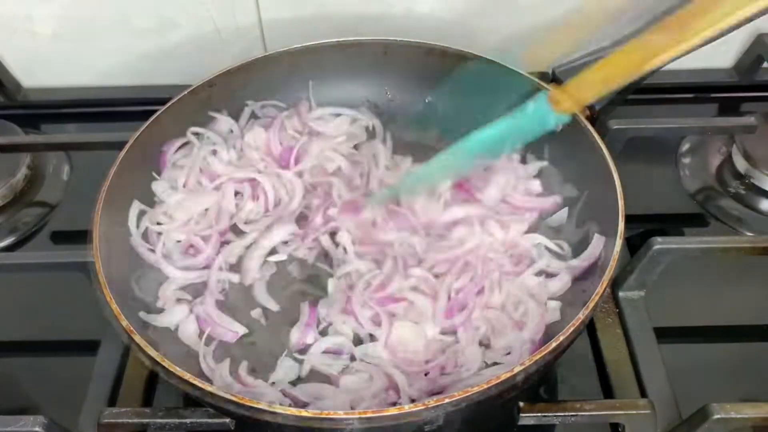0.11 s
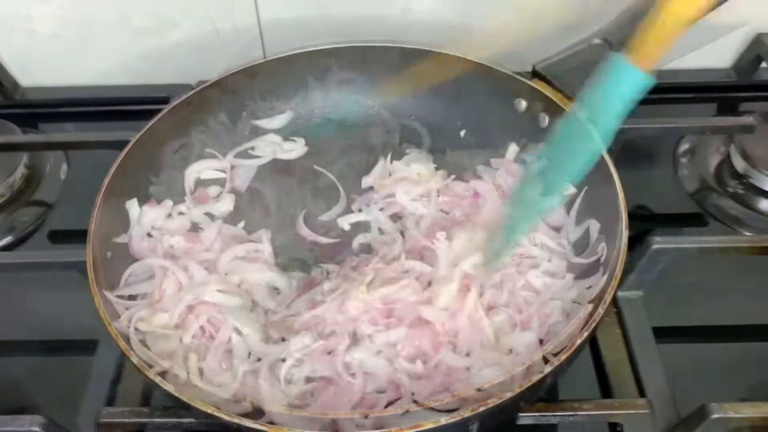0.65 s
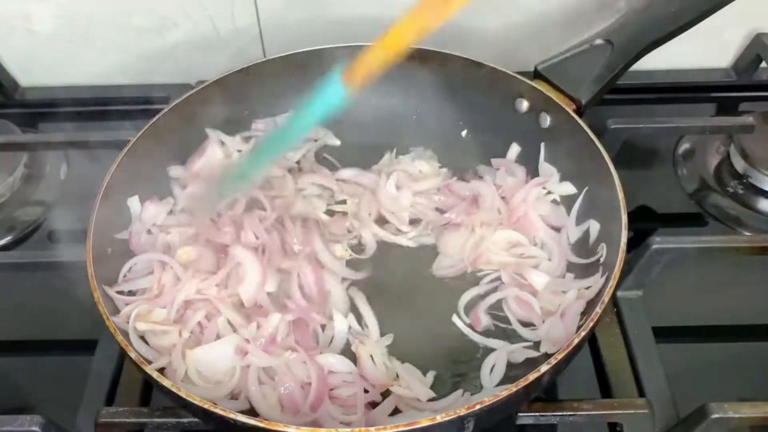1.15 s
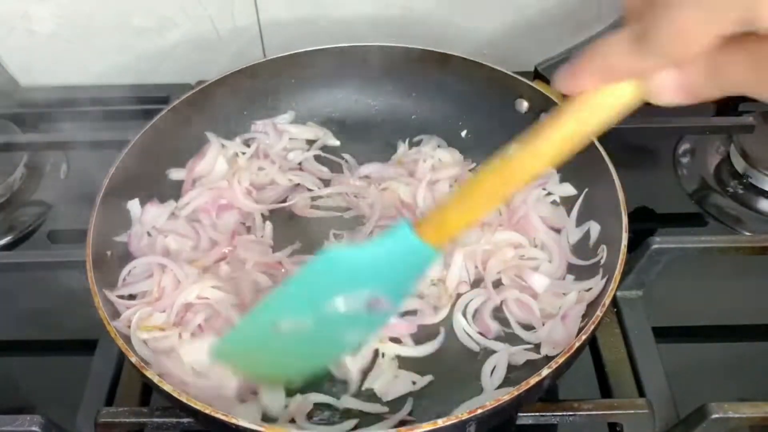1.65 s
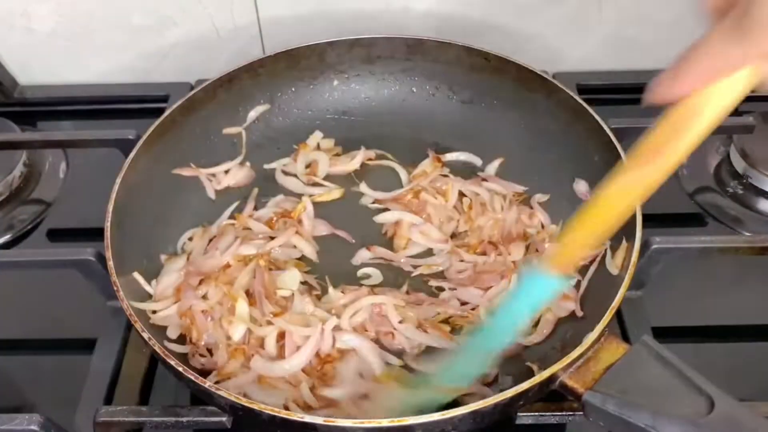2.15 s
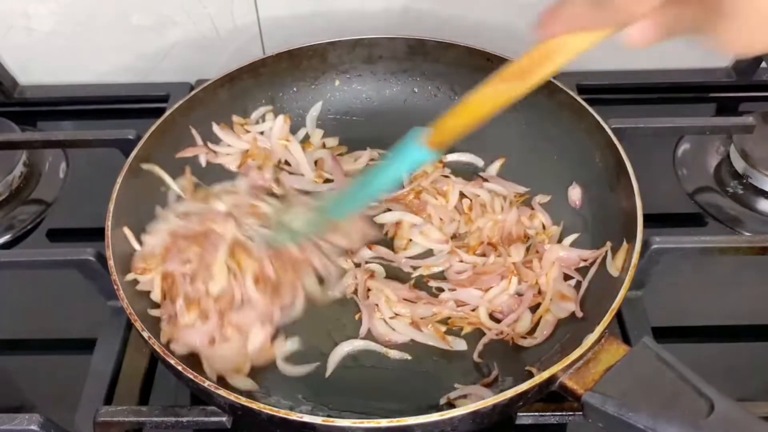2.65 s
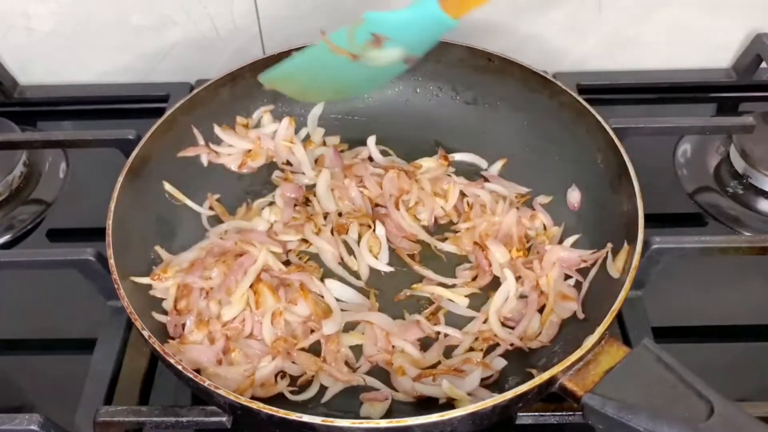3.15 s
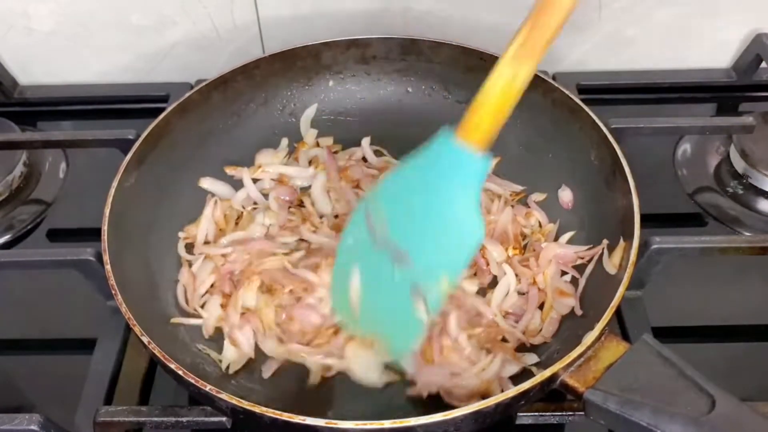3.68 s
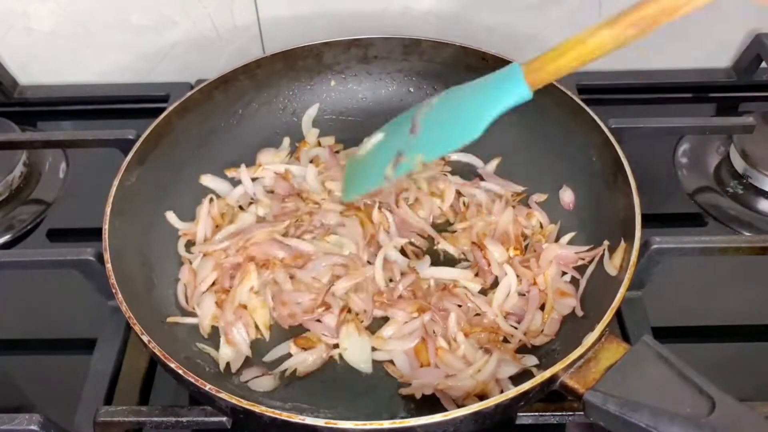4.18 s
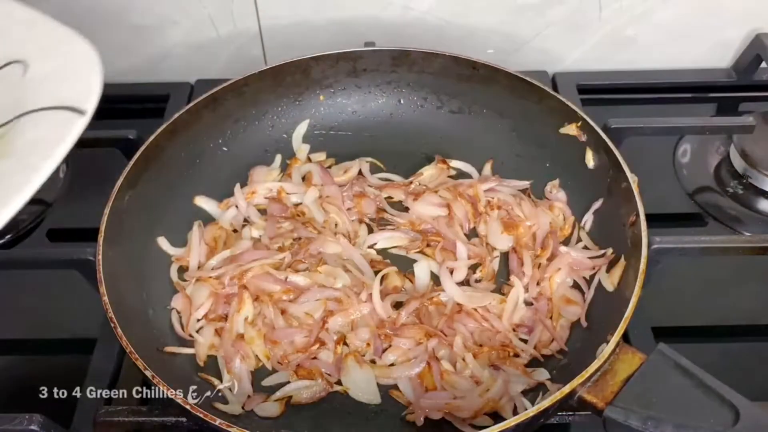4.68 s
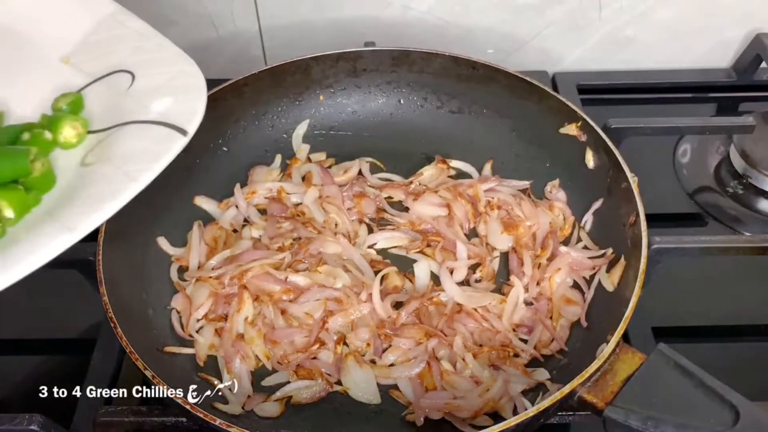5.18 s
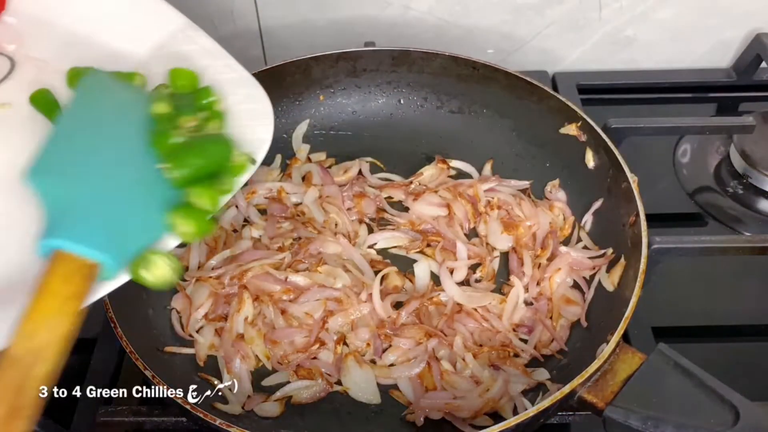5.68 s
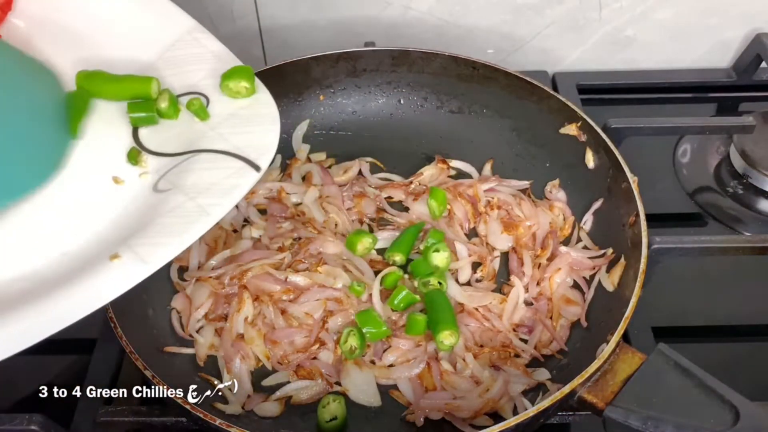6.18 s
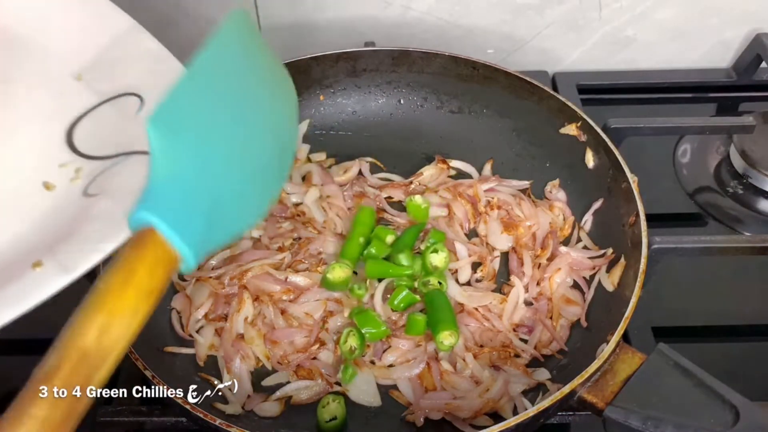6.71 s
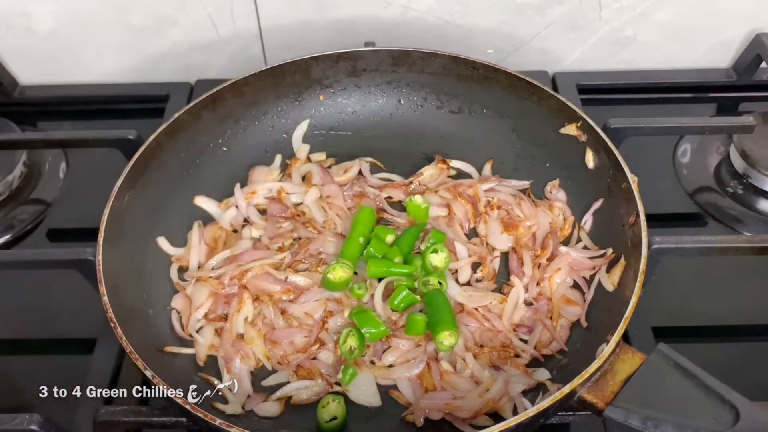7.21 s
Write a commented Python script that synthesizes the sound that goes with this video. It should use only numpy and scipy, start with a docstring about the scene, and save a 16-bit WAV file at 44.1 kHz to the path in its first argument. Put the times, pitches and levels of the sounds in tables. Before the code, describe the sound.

A strong low fan hum near 100 hertz swells over softly sizzling onions in a pan, with sharp fat spits and occasional dull spatula knocks.

```python
"""Sliced onions fry softly in a pan: dense tiny steam bursts hiss, fat spits, a few steam squeaks.
A soft spatula knocks the pan, ringing its modes. Above it an extractor fan: the motor hums near
100 Hz as a wandering sine, its air flow rumbles in the hood as noise with resonances.
Four passages are joined by short fades; from the third on the hum is strong and clean."""
import sys
import numpy as np
from scipy import signal
from scipy.fft import rfft, irfft, next_fast_len
from scipy.io import wavfile

SR = 44100
rng = np.random.default_rng(int(sys.argv[2]) if len(sys.argv) > 2 else 0)


def materialize(psi):
    """Save the field psi as 16-bit PCM at rate SR to the path in sys.argv[1].

    A 1-D psi becomes a single channel; in a 2-D psi each row is a channel.
    """
    bounded = np.clip(np.atleast_2d(psi).T, -1, 1)
    quanta = np.round(bounded * 32767).astype(np.int16)
    wavfile.write(sys.argv[1], SR, quanta)


def boost_factor(decibels):
    """Convert a level in decibels to a linear amplitude factor."""
    exponent = np.asarray(decibels, float) / 20
    return 10 ** exponent


N = 323253

# passage joins: fade-out start t/s, silent from t/s, fade-in start t/s, full again t/s
JOINS = [(.0877, .0881, .0915, .114), (2.0815, 2.0822, 2.1005, 2.124), (4.317, 4.3415, 4.342, 4.375)]
# per passage: hum f/Hz, level/dB rms, left-right level/dB, left phase lead/rad
HUM_BY_PASSAGE = [(95, -26, -1.5, -.3), (101, -32, -2.5, -0.3), (98.5, -15.5, -3, -0.11),
                  (99.1, -16, -1.53, -0.16)]
# per passage: air flow base level/dB rms in 250-1000 Hz, frying treble offset/dB
MIX_BY_PASSAGE = [(-37.5, -2), (-41, 0.46), (-38.5, 0), (-39.5, -2)]
# unsteady hood drones: f/Hz, level/dB rms before DRONE_SWELL, wander corner f/Hz
DRONES = [(198, -50.5, 0.3), (208.8, -38.5, 3.38), (217.1, -41, 4.6)]
# slow gain of all drones: t/s, level/dB
DRONE_SWELL = [(0, -3), (.2, 4), (.6, -6), (1.25, 6), (1.65, 6), (1.85, -10), (2.2, 4.5), (2.65, -9),
               (3.0, 2.5), (3.3, -1.5), (3.9, 4), (4.3, 2), (4.9, -1.5), (5.45, 5), (5.9, -7.5), (6.3, 2),
               (6.65, 0.5), (7.33, 0)]
# broad air noise density: f/Hz, level/dB per Hz (relative to HOOD)
RUSH = [(20, -82), (40, -72.5), (55, -51.5), (110, -64.5), (160, -61.5), (230, -76), (260, -65),
        (330, -63.5), (420, -71.5), (550, -73), (850, -74.5), (1050, -80.5), (1600, -85), (3000, -99)]
# hood resonances stirred by the air: f/Hz, -6 dB width/Hz, level/dB (relative to RUSH)
HOOD = [(76, 14, -42), (107.5, 8, -33), (121.2, 25, -43.5), (175.8, 8.8, -44), (200.4, 37, -42.5),
        (299.5, 27, -45.5), (314.5, 9.1, -45.5), (332.2, 14, -47.5), (357.7, 7.4, -45), (384, 11, -47.5),
        (405.3, 11, -57), (463, 53, -50.5), (595.6, 34, -52.5), (632, 47, -49.5)]
# spatula knocks: t/s, peak level/dB before a 1 dB tilt per side, softness cut-off f/Hz
KNOCKS = [(.959, -25.5, 900), (1.596, -17.5, 2200), (4.263, -22, 642)]
# pan modes: f/Hz, relative level/dB, t60/s
PAN_MODES = [(126, -3, 0.045), (374, -1, 0.039), (467, 6, 0.028), (636, 10, 0.031), (860, 1.5, 0.089),
             (945, -23, 0.026), (1226, 0.5, 0.035), (1460, -25, .02)]
# steam squeaking out from under a slice: t/s, length/s, f/Hz, level/dB rms before swell and stereo
SQUEAKS = [(1.194, 0.12, 6300, -41.5), (6.475, .02, 6500, -46), (6.773, 0.035, 6500, -36.5),
           (6.958, .06, 7000, -40.5)]
# loud fat spits: t/s, peak level/dB before stereo, ring f/Hz, crack-to-ring level/dB
SPITS = [(0.7079, -22.5, 12500, 4), (0.7781, -21, 2500, 17), (1.1003, -7, 1750, 6),
         (1.1764, -20, 7450, -12), (1.4476, -21, 7500, -17), (1.7427, -16.5, 8350, 0),
         (1.9924, -22, 12500, -6), (2.2643, -25, 11500, -8), (2.7683, -9, 1410, 14), (2.9826, -22, 3250, 2),
         (3.1118, -21.5, 13000, -6.5), (3.253, -16, 3370, 11), (4.2258, -29, 5500, -6),
         (6.09, -23.5, 3200, 7), (6.2399, -23.5, 11000, -8), (6.339, -24.5, 6950, 8),
         (6.3672, -21, 3320, 14), (6.4706, -17.5, 6200, 2), (6.6334, -20, 9350, -1), (6.758, -19, 3340, 17),
         (6.9729, -17.5, 3200, 8), (7.1369, -13.5, 7400, -10), (7.1902, -7.5, 4800, 0.5)]
# frying vigour: t/s, level/dB rms in 2-7 kHz before flicker
VIGOUR = [(0.0, -55), (.455, -55), (.76, -47.5), (.97, -44), (1.19, -44), (1.78, -43.5), (1.91, -45),
          (2.03, -47.5), (2.08, -41.5), (2.13, -51), (2.7, -49), (3.37, -51), (4.31, -51), (4.38, -51.5),
          (5.85, -51.5), (6.9, -49.5), (7.2, -48), (7.33, -46)]
# hiss spectrum: f/Hz, relative level/dB per Hz
HISS = [(600, -0.5), (1200, -7.5), (2000, 0.5), (2700, -0.5), (3400, 2.5), (5000, 1), (7500, 0.5),
        (8300, 3.5), (9500, 1), (13000, 1.5), (14500, -3.5), (15600, -7), (15800, -40)]
# power share arriving straight, alike in both channels: f/Hz, share/0-1
DIRECT = [(60, 0.68), (130, 1), (220, 0.7), (380, 0.79), (550, 0.26), (800, 0.2), (1500, 0.24), (3500, 0),
          (5500, 0.43), (8500, 0.13), (10000, 0.42), (11000, 1), (16000, .99)]
# channel balance: f/Hz, left-right level/dB
SIDES = [(60, 2.5), (180, -6), (550, -1), (1650, 0.5), (4970, -1.0), (15000, -0.5)]
# phase lead of the straight sound at right: f/Hz, lead/rad
RIGHT_LEADS = [(0, 0), (430, .45), (750, 1.3), (1000, -1.5), (1600, .7), (2300, -.5), (2700, -2.5),
               (4000, -2), (4700, -3.2), (7000, -7.5), (7500, -4.8), (8500, -3.2), (10200, 0),
               (13570, 6.28), (16960, 12.57)]

HUM_WAVER_DB, HUM_WAVER_HZ, HUM_WANDER_HZ = -39.5, 4.4, 0.18
AIR_FOLLOWS = 0.26  # dB of air per dB of vigour
SMALL_SPITS, SMALL_OVER_HISS_DB = 30, 17
RING_OCTAVES, CRACK_LOW_HZ, CRACK_HIGH_HZ = 0.85, 1250, 14200
SPRAY_S, SIZZLE_S = 0.005, 0.025  # 1/e decays


def rms_one(x):
    """Scale to rms 1."""
    return x / np.sqrt(np.mean(x ** 2) + 1e-20)


def in_time(rows):
    """Columns of a curve, interpolated at every sample."""
    s, *columns = np.transpose(rows)
    return [np.interp(np.arange(N) / SR, s, c) for c in columns]


def by_passage(rows):
    """Columns of a per-passage table, held at every sample."""
    silent_from = np.array(JOINS)[:, 1] * SR
    return np.array(rows)[np.searchsorted(silent_from, np.arange(N))].T


def at_hz(points, hz):
    """Table interpolated over log frequency."""
    table_hz, value = np.array(points).T
    return np.interp(np.log(hz), np.log(table_hz), value)


def drift(corner_hz):
    """Random wander of rms 1: noise through a double pole, run at SR/40."""
    r = np.exp(-80 * np.pi * corner_hz / SR)
    noise = rng.standard_normal(N // 40 + 2002)
    slow = signal.lfilter([1], [1, -2 * r, r * r], noise)[2000:]
    return np.interp(np.arange(N) / 40, np.arange(len(slow)), rms_one(slow))


def unsteady(db, corner_hz):
    """Complex amplitude whose strength and phase wander randomly."""
    return boost_factor(db) * (drift(corner_hz) + 1j * drift(corner_hz)) / np.sqrt(2)


def butter(x, order, hz, kind="low"):
    """Causal Butterworth filter."""
    return signal.sosfilt(signal.butter(order, hz, kind, fs=SR, output="sos"), x)


def level_in(x, low_hz, high_hz):
    """Rms of the channels' mean between two frequencies."""
    mid = butter(x.mean(axis=0), 4, [low_hz, high_hz], "band")
    return np.sqrt(np.mean(mid ** 2))


def split(x, cuts_hz):
    """Bands peeled off from below, up to the last cut, without phase shift."""
    for hz in cuts_hz:
        low = signal.sosfiltfilt(signal.butter(2, hz, fs=SR, output="sos"), x)
        x = x - low
        yield low


def stereo(three, power):
    """Shape by power(hz); row 0 arrives straight in both channels, rows 1-2 are each one's diffuse share."""
    size = next_fast_len(N)
    hz = np.maximum(np.arange(size // 2 + 1) * SR / size, 1)
    straight, left, right = rfft(three, size) * np.sqrt(power(hz))
    share = np.clip(at_hz(DIRECT, hz), 0, 1)
    tilt = boost_factor(at_hz(SIDES, hz) / 2)
    left_lag = np.exp(-1j * np.interp(hz, *np.transpose(RIGHT_LEADS)))
    left = tilt * (np.sqrt(share) * straight * left_lag + np.sqrt(1 - share) * left)
    right = (np.sqrt(share) * straight + np.sqrt(1 - share) * right) / tilt
    return irfft([left, right], size)[:, :N]


def motor_hum():
    """Motor sine with an unsteady part, plus hood drones about an octave up; both panned per passage."""
    hz, level_db, pan_db, lead_rad = by_passage(HUM_BY_PASSAGE)
    turn = 2j * np.pi / SR
    strength = boost_factor(level_db) + unsteady(HUM_WAVER_DB, HUM_WAVER_HZ)
    hum = strength * np.exp(turn * np.cumsum(hz + HUM_WANDER_HZ * drift(1.02)))
    drones = sum(unsteady(db, corner_hz) * np.exp(turn * drone_hz * np.arange(N))
                 for drone_hz, db, corner_hz in DRONES)
    both = hum + boost_factor(*in_time(DRONE_SWELL)) * drones
    left = boost_factor(pan_db / 2) * both * np.exp(1j * lead_rad)
    right = boost_factor(-pan_db / 2) * both
    return np.sqrt(2) * np.imag([left, right])


def air_flow():
    """Broad turbulent noise plus noise gathered in narrow hood resonances, swelling a little."""
    def power(hz):
        hood = sum(boost_factor(2 * db) / width_hz / (1 + ((hz - mid_hz) / width_hz * 2) ** 2) ** 2
                   for mid_hz, width_hz, db in HOOD)
        return hood + boost_factor(2 * at_hz(RUSH, hz))
    vigour_db, = in_time(VIGOUR)
    level_db = by_passage(MIX_BY_PASSAGE)[0] + AIR_FOLLOWS * (vigour_db - vigour_db.mean())
    air = stereo(rng.standard_normal((3, N)), power)
    swell = boost_factor(level_db + 0.71 * drift(6.5))
    return swell * air / level_in(air, 250, 1000)


def knocks():
    """Soft blade lands on the pan: a short dull scuff excites decaying modes."""
    t = np.arange(int(0.15 * SR)) / SR
    out = np.zeros(N)
    for s, peak_db, soft_hz in KNOCKS:
        touch = rng.standard_normal(len(t)) * np.exp(-t / 0.011) + 12 * (t == 0)
        touch = butter(touch, 2, soft_hz)
        ring = 0
        for hz, level_db, t60_s in PAN_MODES:
            r, w = boost_factor(-60 / (t60_s * SR)), 2 * np.pi * hz / SR
            mode = signal.lfilter([0, boost_factor(level_db) * np.sin(w)], [1, -2 * r * np.cos(w), r * r], touch)
            ring = ring + mode
        out[round(s * SR):][:len(t)] += boost_factor(peak_db) * ring / np.max(np.abs(ring))
    return out * boost_factor(np.array([[-1.], [1.]]))  # left/right tilt, dB


def squeaks(width_hz=900):
    """Escaping steam: short swells of noise in a narrow high band."""
    out = np.zeros((3, N))
    for s, length_s, hz, db in SQUEAKS:
        size = int(length_s * SR)
        band_hz = [hz - width_hz / 2, hz + width_hz / 2]
        noise = butter(rng.standard_normal((3, SR // 4)), 2, band_hz, "band")[:, -size:]
        out[:, int(s * SR):][:, :size] += boost_factor(db) * rms_one(noise) * np.hanning(size)
    return stereo(out, np.ones_like)


def small_spits():
    """Faint spits at random moments, in the columns of SPITS; their peaks follow the vigour."""
    chance = rng.random((SMALL_SPITS, 4))
    when_s = chance[:, 0] * N / SR
    vigour_db = np.interp(when_s, *np.transpose(VIGOUR))
    peak_db = vigour_db + SMALL_OVER_HISS_DB + 6 * chance[:, 1]
    return np.c_[when_s, peak_db, 4000 * 3 ** chance[:, 2], -3 + 8 * chance[:, 3]]


def spits(crack_s=0.00054, tail_db=-7, rise_s=0.0003, sizzle_db=-24, snap=2.8):
    """Water drop explodes in fat: sharp crack, then a short noise spray strongest around the drop's ring."""
    t = np.arange(int(0.08 * SR)) / SR - 0.0012
    crack_shape = np.exp(np.minimum(t / rise_s, -t / crack_s))
    tail = boost_factor(tail_db) * np.exp(-t / SPRAY_S) + boost_factor(sizzle_db) * np.exp(-t / SIZZLE_S)
    shape = crack_shape + tail * (t > 0)
    click = snap * (np.arange(len(t)) == np.argmax(shape))
    out = np.zeros((3, N + len(t)))
    for s, peak_db, hz, crack_db in [*SPITS, *small_spits()]:
        noise = rng.standard_normal((3, len(t))) * shape + click
        edges_hz = np.minimum(hz * 2 ** (np.array([-0.5, 0.5]) * RING_OCTAVES), [14000, 16000])
        ring = butter(noise, 2, edges_hz, "band")
        crack = butter(butter(noise, 2, CRACK_LOW_HZ, "high"), 1, CRACK_HIGH_HZ)
        drop = rms_one(ring) + boost_factor(crack_db) * rms_one(crack)
        out[:, int(s * SR):][:, :len(t)] += boost_factor(peak_db) * drop / np.max(np.abs(drop), axis=1, keepdims=True)
    return stereo(out[:, :N], np.ones_like)


def frying(per_s=9000, spread_db=3.0):
    """Thousands of tiny steam bubbles burst each second; bands flicker together and alone."""
    sizes = boost_factor(spread_db * np.minimum(rng.exponential(1, (3, N)), 5)) * rng.choice([-1, 1], (3, N))
    bursts = sizes * (rng.random((3, N)) < per_s / SR)
    hiss = stereo(bursts, lambda hz: boost_factor(2 * at_hz(HISS, hz)))
    body_db, = in_time(VIGOUR)
    top_db = body_db + by_passage(MIX_BY_PASSAGE)[1]
    body = boost_factor(body_db) / level_in(hiss, 2000, 7000)
    top = boost_factor(top_db) / level_in(hiss, 7000, 11000)
    together_db = 0.6 * drift(3) + 0.6 * drift(8) + 0.6 * drift(25)
    bands = split(hiss, [1800, 3500, 7000, 11000, 20000])
    gains = [body] * 3 + [top] * 2
    return sum(gain * boost_factor(together_db + 0.47 * drift(32)) * band for gain, band in zip(gains, bands))


def scene():
    """Fan and pan together."""
    return motor_hum() + air_flow() + knocks() + squeaks() + spits() + frying()


def top_cut(x):
    """Nothing passes above the cut-off."""
    return signal.sosfilt(signal.butter(12, 15640, fs=SR, output="sos"), x)


def record(dry):
    """Passages fade out and in at each join."""
    fade = np.interp(np.arange(N) / SR, np.ravel(JOINS), np.tile([1, 0, 0, 1], len(JOINS)))
    mix = dry * fade
    return top_cut(mix)


dry = scene()
out = record(dry)
materialize(out)
```